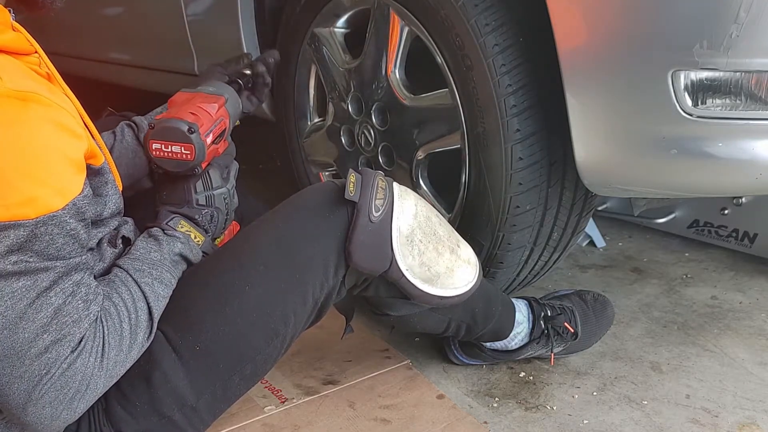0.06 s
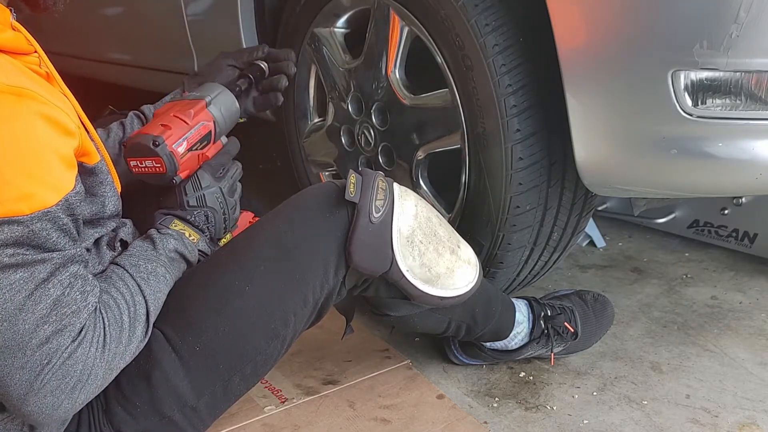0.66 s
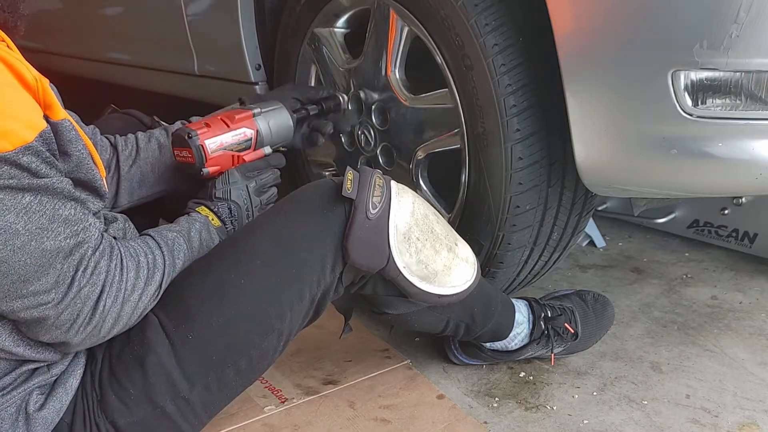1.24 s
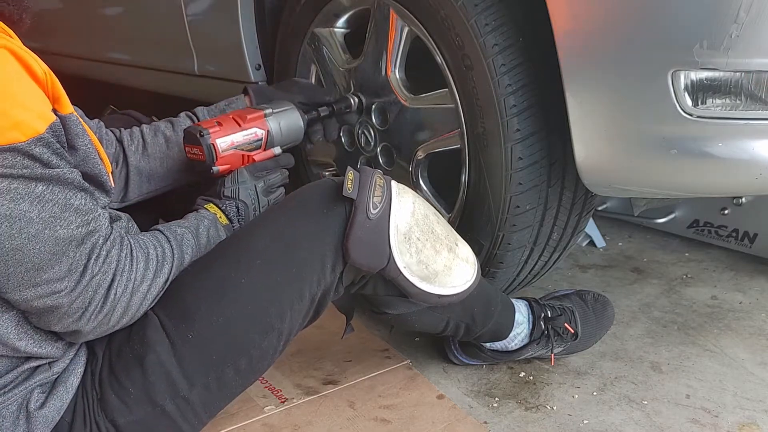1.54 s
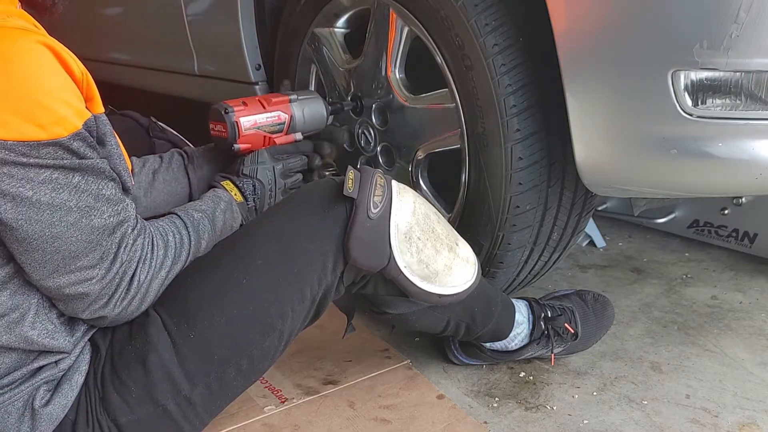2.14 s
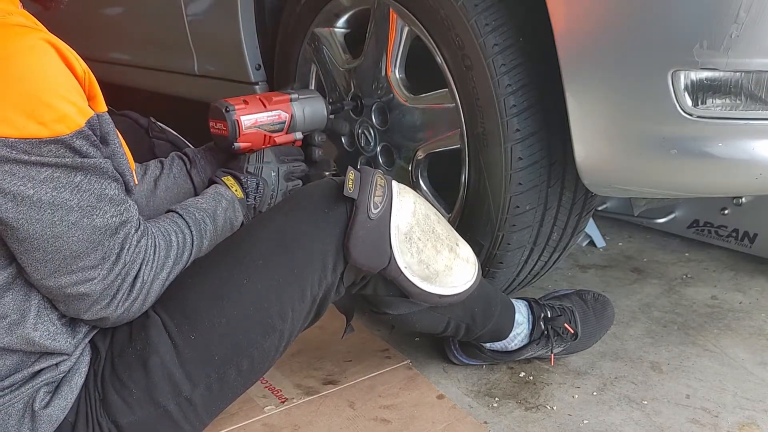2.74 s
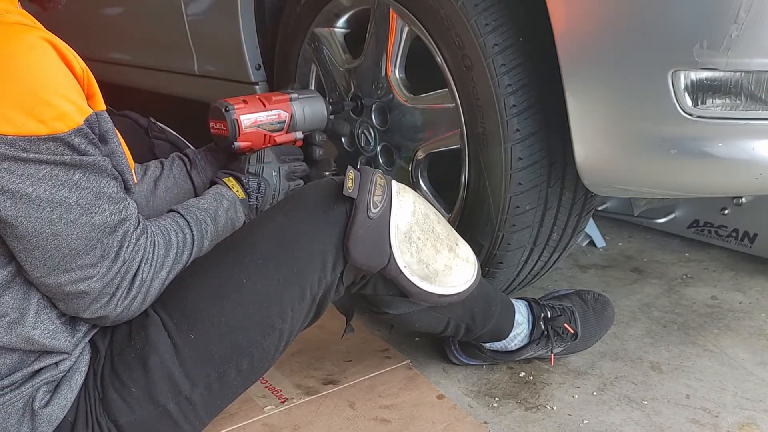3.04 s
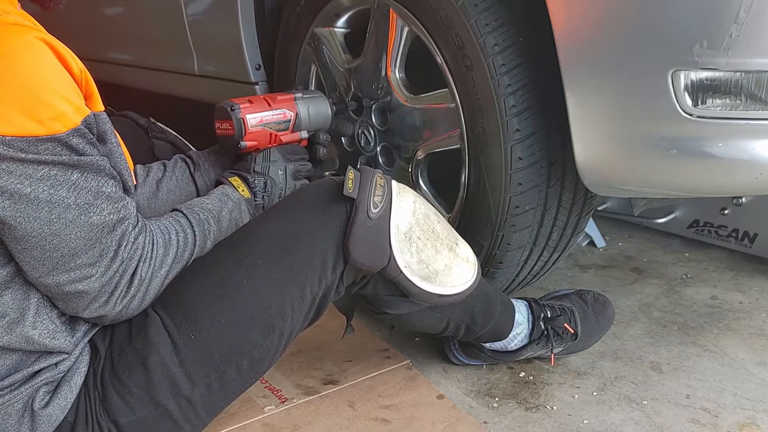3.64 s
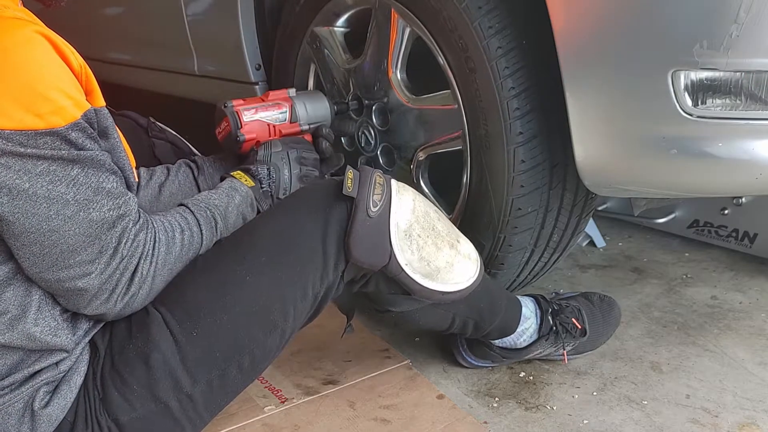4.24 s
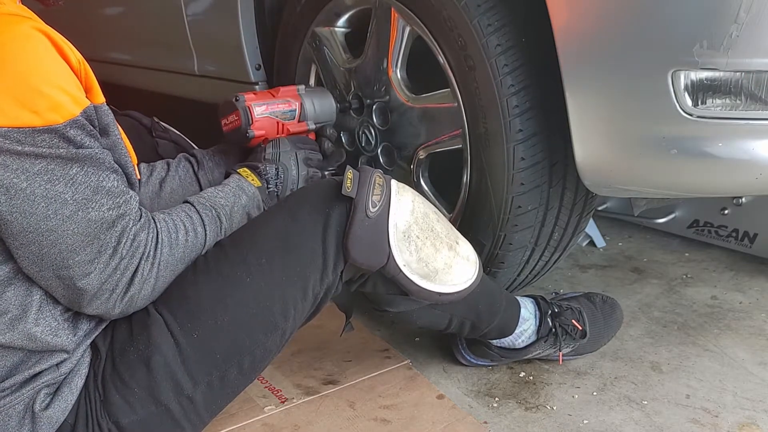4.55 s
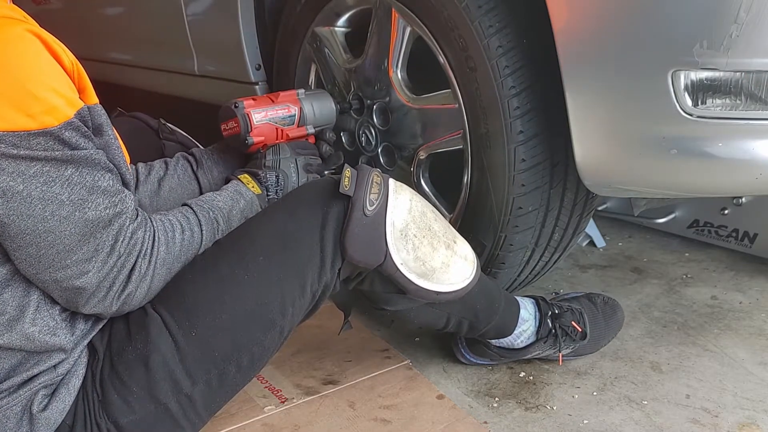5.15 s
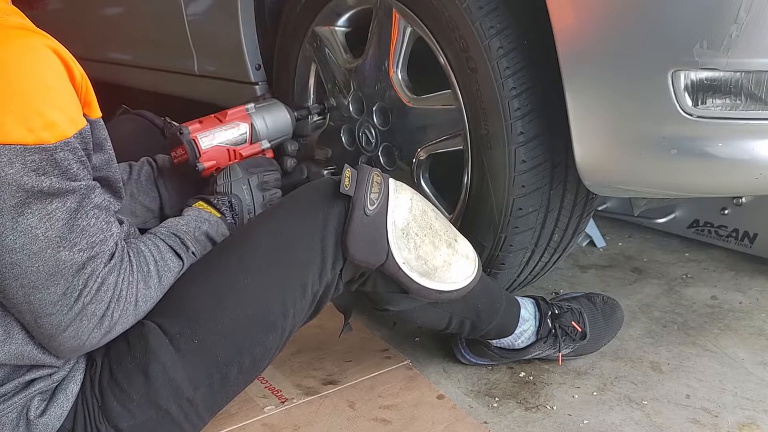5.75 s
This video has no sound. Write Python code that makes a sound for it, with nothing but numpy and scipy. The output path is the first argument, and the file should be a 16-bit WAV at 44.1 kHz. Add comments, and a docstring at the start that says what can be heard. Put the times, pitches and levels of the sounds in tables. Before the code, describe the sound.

A quiet garage with faint steady air noise, heard in stereo from about a metre away. Steel lug nuts clink lightly right at the start, followed by faint brushes of sleeves and gloves. Another small clink comes at 1.4 seconds, and a steel socket clacks onto the nut several times around 1.6. At 2.7 seconds a cordless impact wrench starts with one sharp strike and spins the nut down, its gears whirring under a thin high whistle, with ringing socket knocks near 3.0 and 3.5. From 3.9 the motor slows and the thread rumbles; a burst of loud hammer blows rings the wheel from 4.1 to 4.3, then the motor stops. A second short pull from 4.6 to 4.9 brings another rapid hammering burst. Each leaves a brief room echo. A light socket knock and nut click follow around 5.3 seconds, then only quiet air.

```python
"""Impact wrench at a car wheel

A garage, a pair of microphones about a metre from a cordless wrench. Lug nuts clink in a gloved hand,
the socket knocks onto a stud, and the motor spins the nut down with gear whirr and a thin inverter
whistle. The hammer strikes once at the start, then in two short bursts that ring the wheel."""
import sys
import numpy as np
from scipy import signal
from scipy.fft import rfft, irfft
from scipy.io import wavfile

SR = 44100
rng = np.random.default_rng(int(sys.argv[2]) if len(sys.argv) > 2 else 0)


def store_wav(level_fs):
    """Save 16-bit WAV to argv[1]."""
    pcm = np.round(np.clip(np.atleast_2d(level_fs), -1, 1) * 32767)
    wavfile.write(sys.argv[1], SR, pcm.T.astype(np.int16))


N = 255780
T = np.arange(N) / SR
FREE_HZ = 380  # electrical speed of the motor running free

# how alike the two microphones hear the room: (frequency [Hz], likeness [0-1])
LIKENESS = [(60, 0.97), (300, 0.87), (700, 0.7), (1500, 0.25), (4000, 0.095), (16000, 0.42)]


def amp(db):
    return 10 ** (np.asarray(db) / 20)


def unit_rms(x):
    return x / np.sqrt(np.mean(x ** 2) + 1e-30)


def read(points, hz):
    """Points joined by straight lines on a log-frequency axis."""
    f, value = np.transpose(points)
    return np.interp(np.log(hz + 1), np.log(f + 1), value)


def drift(rate_hz):
    """Slow random wander of rms 1."""
    hz = np.fft.rfftfreq(N, 1 / SR)
    return unit_rms(irfft(rfft(rng.standard_normal(N)) * np.exp(-(hz / rate_hz) ** 2), N))


def swells(rows):
    """A smooth rise and fall of amplitude for each row."""
    return sum(amp(db) * np.exp(-(2 * (T - s) / length) ** 2) for s, length, db in rows)


def noise(spectrum, size=N, tilt_db=0):
    """Coloured noise at two microphones, alike in the bass and less so in the treble."""
    hz = np.fft.rfftfreq(size, 1 / SR)
    left, other = rfft(rng.standard_normal((2, size)))
    alike = read(LIKENESS, hz)
    right = alike * left + np.sqrt(1 - alike ** 2) * other
    colour = amp(read(spectrum, hz) + tilt_db * np.log2(np.maximum(hz, 1100) / 2000))
    return unit_rms(irfft(np.array([left, right]) * colour, size))


def cracks(contacts, spectrum, scatter_db, scatter_s, rise_s):
    """Steel on steel: a short rattle, then scatter from the parts nearby."""
    out, t = np.zeros((2, N)), np.arange(2 ** 13) / SR
    for s, db, hardness, rattle_s in contacts:
        energy = np.exp(-2 * t / rattle_s) + amp(scatter_db) ** 2 * np.exp(-2 * t / scatter_s)
        envelope = amp(db) * np.sqrt(energy) * (1 - np.exp(-t / rise_s))
        crack = envelope * noise(spectrum, size=len(t), tilt_db=hardness)
        start = round(s * SR)
        out[:, start:start + len(t)] += crack[:, :N - start]
    return out


def dying(kicks, t60):
    """Energy put in by each kick, falling 60 dB in t60 seconds."""
    return signal.lfilter([1], [1, -np.exp(-np.log(10 ** 6) / (t60 * SR))], kicks)


def ringing(contacts, modes, ring_db, ping_db, ping_t60, blur):
    """Each contact feeds every mode with a ping and a ring. Loose seating blurs the pitch."""
    s, db, hardness, _ = np.transpose(contacts)
    out = np.zeros((2, N))
    for hz, mode_db, t60 in modes:
        kicks = np.zeros(N)  # harder contacts favour the high modes
        kicks[(s * SR).astype(int)] = amp(db + hardness * np.log2(hz / 3000) / 2) ** 2
        energy = amp(ring_db) ** 2 * dying(kicks, t60) + amp(ping_db) ** 2 * dying(kicks, ping_t60)
        swing = signal.lfilter([.03], [1, -.97], np.sqrt(energy + 1e-24))  # softens the onset
        phase_walk = np.cumsum(rng.standard_normal(N)) * np.sqrt(2 * np.pi * blur * hz / SR)
        phase = 2 * np.pi * hz * T + phase_walk
        apart = np.sqrt(1 - read(LIKENESS, hz)) * drift(24)
        out += amp(mode_db) * swing * np.cos([phase + apart, phase - apart])
    return out


def room_tone():
    """Still air that wavers and slowly eases off, with a distant low drone."""
    # spectra of the air and the drone: (frequency [Hz], relative level [dB])
    air = [(15, -51.5), (25, -22.5), (157, -3), (326, -7.5), (363, -12.5), (416, -10.5), (659, -16),
           (818, -16.5), (988, -23.5), (2110, -29), (6210, -40.5), (7310, -45.5), (8140, -44), (16000, -38)]
    drone = [(60, -43.5), (92, -19.5), (104, -1.5), (108, 1), (120, -13.5), (160, -44), (400, -83)]
    # the drone comes and goes: (time [s], relative level [dB])
    drone_levels = [(0.0, -64.5), (0.46, -64), (0.77, -80.5), (1.12, -61), (1.56, -62), (1.62, -73.5),
                    (2.57, -81), (2.6, -79.5)]
    drone_db = np.interp(T, *np.transpose(drone_levels)) + 1.5
    air_db = -66 - 0.64 * T - drift(8.1)
    return amp(air_db) * noise(air) + amp(drone_db) * noise(drone)


def lug_nuts():
    """Loose nuts touch in the hand and ring high and briefly."""
    # touches: (time [s], relative level [dB], hardness [dB/octave], rattle time [s])
    clinks = [(.002, -54, -2.5, 0.13), (.0545, -32, -7, 0.0006), (.112, -49, -1.5, 0.024),
              (.1438, -45, -5, 0.0088), (1.420, -47.5, 2, 0.0043), (5.276, -64, 6, .004),
              (5.341, -50, -6, .006)]
    # spectrum of a touch: (frequency [Hz], relative level [dB])
    spectrum = [(300, -37), (1200, -31), (1700, 0), (2200, -4.5), (3200, -5.5), (4000, -4.5), (5200, -6),
                (8000, -2.5), (10500, -28), (12200, 2), (13500, -17.5), (16000, -24.5)]
    # modes of a nut: (frequency [Hz], relative level [dB], t60 [s])
    modes = [(2100, -7, 0.055), (7060, -1, 0.027), (9200, -16, .05), (11900, 1.5, 0.18),
             (12000, -5.5, 0.21), (12400, -21.5, .09)]
    return (cracks(clinks, spectrum, scatter_db=-9.5, scatter_s=0.01, rise_s=0.0011)
            + ringing(clinks, modes, ring_db=-5.5, ping_db=-8, ping_t60=0.033, blur=0.021))


def faint_tones():
    """Two soft tones swell and fade, a low one early and a high one late."""
    # tones: (middle [s], length [s], pitch [Hz], level [dB])
    tones = [(0.53, 0.23, 497, -63.5), (5.698, 0.05, 7300, -78)]
    out = np.zeros(N)
    for s, length, hz, db in tones:
        pitch = hz * (1 + 0.0043 * drift(200))
        out += swells([(s, length, db)]) * np.sin(2 * np.pi * np.cumsum(pitch) / SR)
    return out


def cloth():
    """Sleeves and gloves brush in soft swells of friction."""
    # brushes: (middle [s], length [s], level [dB])
    brushes = [(0.618, 0.14, -73), (.77, 0.35, -79.5), (1.366, 0.13, -76.5), (1.595, 0.058, -60.5),
               (2.106, 0.057, -70)]
    # spectrum of the fabric: (frequency [Hz], relative level [dB])
    spectrum = [(200, 2), (1200, -1.5), (3500, -4), (9000, -15.5), (16000, -12.5)]
    return swells(brushes) * noise(spectrum) * amp(1.4 * drift(120))


def socket():
    """The steel socket knocks on nut and stud, and rings."""
    # knocks: (time [s], relative level [dB], hardness [dB/octave], rattle time [s])
    knocks = [(1.44, -62, -14.5, 0.033), (1.609, -24, 5.5, .0024), (1.648, -37.5, 10, .009),
              (1.677, -32.5, 4, 0.013), (1.685, -32, -1.5, 0.0072), (2.660, -47, 4.5, 0.0082),
              (3.016, -32, 2, 0.007), (3.464, -22, 3.5, 0.0072), (3.483, -35.5, -11, 0.077),
              (4.073, -36.5, -6, 0.031), (4.156, -23, -13.5, .007), (4.541, -51, 0.5, 0.071),
              (4.597, -45.5, 2.5, 0.023), (5.274, -43.5, 1.5, 0.0075)]
    # spectrum of a knock: (frequency [Hz], relative level [dB])
    spectrum = [(40, -68.5), (150, -22.5), (400, -16.5), (750, -17), (1300, 5), (2050, 6.5), (2800, -0.5),
                (3550, 8), (4000, 7.5), (5450, -6), (6200, -3.5), (7300, -7), (8500, -19.5), (10400, -19.5),
                (16000, -28.5)]
    # modes of the socket on its stud: (frequency [Hz], relative level [dB], t60 [s])
    modes = [(1005, -11.5, 0.41), (1190, -11, .2), (1408, -3.5, 0.42), (2020, 0, 0.42), (3504, 4, 0.25),
             (3715, -2.5, 0.18), (4406, -4, 0.12), (5410, 0, .16), (5490, -8.5, 0.35), (5740, -9.5, 0.36),
             (6920, -18, 0.6), (7500, -19, .25)]
    return (cracks(knocks, spectrum, scatter_db=-11, scatter_s=0.049, rise_s=0.003)
            + ringing(knocks, modes, ring_db=-14.5, ping_db=-10, ping_t60=0.068, blur=0.0041))


def thread(speed):
    """The thread rumbles with the speed, and in swells where nut and socket rub on the stud."""
    # rubs: (middle [s], length [s], relative level [dB])
    rubs = [(1.705, 0.083, -45), (3.02, .05, -40), (3.18, .05, -42.5), (3.66, .22, -45.5), (3.93, .06, -45),
            (4.095, 0.068, -36.5), (4.15, .045, -26), (4.3, 0.14, -33), (4.88, .08, -28.5)]
    # spectrum of the rumble: (frequency [Hz], relative level [dB])
    spectrum = [(40, -69), (80, -26), (130, -4.5), (300, 6), (560, 0.5), (900, -2.5), (1600, 0),
                (3000, -24), (6000, -65)]
    level = amp(-75.45) * speed / FREE_HZ + amp(-9.45) * swells(rubs)
    return level * noise(spectrum) * amp(0.97 * drift(45))


def motor_speed():
    """Two pulls of the trigger; the speed sags as the nut tightens."""
    # first and second pull: (time [s], electrical speed [Hz])
    run_down = [(2.648, 0), (2.75, 335.5), (2.83, 400), (2.97, 421.5), (3.02, 410), (3.08, 430.5),
                (3.16, 425.5), (3.21, 380), (3.35, 360.5), (3.56, 381), (3.72, 376.5), (3.88, 319),
                (3.93, 217.5), (4.07, 238), (4.22, 153), (4.31, -4)]
    tighten = [(4.595, 4.5), (4.71, 221.5), (4.84, 167.5), (4.92, 0)]
    return np.maximum(np.interp(T, *np.transpose(run_down + tighten)), 0)


def gears(speed):
    """Meshing teeth whirr and sing, louder as the motor speeds up."""
    # spectrum of the whirr: (frequency [Hz], relative level [dB])
    spectrum = [(290, -34.5), (550, -12), (730, -20), (1180, -12), (1820, -6.5), (2600, 2), (3400, -6.5),
                (4800, -10), (7000, -11.5), (8300, -16), (10900, -11.5), (13000, -20.5), (14500, -18),
                (16000, -18.5)]
    # gear and bearing tones: (pitch [multiple of speed], relative level [dB], waver [share of pitch])
    tones = [(.8, -18, .012), (1.52, -12.5, 0.024), (2.28, -16, 0.015), (3.24, -2.5, .009),
             (4, -8.5, 0.0046), (4.55, -6, .012), (5.6, -7.5, 0.0053), (6, -11.5, 0.002), (6.93, 1.5, .007),
             (7.95, -17.5, .008), (9.9, -7, 0.024), (14.9, -14, .0023)]
    # the tones stand out as the motor frees: (speed [Hz], gain [ratio])
    tone_gains = [(220, 0.12), (360, 0.73), (410, 0.77)]
    rotor_turns = np.cumsum(speed) / SR / 2  # two electrical cycles to a turn
    teeth = 1 + .35 * np.cos(2 * np.pi * rotor_turns) + 0.095 * drift(250)
    whirr = amp(6.5) * noise(spectrum) * unit_rms(teeth)
    singing = np.interp(speed, *np.transpose(tone_gains))
    for multiple, db, waver in tones:
        phase = 2 * np.pi * np.cumsum(multiple * speed * (1 + waver * drift(40))) / SR
        mic_phases = 0.87 * np.array([drift(4.1), drift(5.5)])
        flutter_db = 2.5 * drift(25)
        whirr += singing * amp(db + flutter_db) * np.sqrt(2) * np.cos(phase + mic_phases)
    return amp(-50.95) * (speed / FREE_HZ) ** 0.64 * whirr


def housing(speed, resonant_hz=232, half_width_hz=48):
    """The housing rings, most at the motor speed where the gear mesh meets its resonance."""
    # spectrum of the ring: (frequency [Hz], relative level [dB])
    spectrum = [(1200, -68), (2300, -23.5), (2560, 0), (2660, -16), (2780, 2), (2890, 2.5), (3080, -14),
                (3500, -12.5), (6000, -61.5)]
    resonance_db = 15 * np.exp(-((speed - resonant_hz) / half_width_hz) ** 2)
    return noise(spectrum) * amp(-55.95 + resonance_db + 2.8 * drift(80))


def inverter(speed, switch_hz=7880):
    """The switched motor current whistles in pairs of lines that part as the speed rises."""
    # whistle lines: (carrier [multiple of switching rate], offset [multiple of speed])
    sidebands = [(1, 1), (1, -1), (1, 0), (1, 2), (1, -2), (1, -3), (1, -4), (1, 4), (2, -1), (2, -2),
                 (2, -3)]
    # strength of each line: (relative level [dB])
    levels = [-49.5, -54, -68.5, -60, -61, -56.5, -67.5, -57.5, -57.5, -65.5, -66.5]
    # the motor case favours some pitches: (frequency [Hz], gain [dB])
    motor_case = [(7000, 0), (7440, 2), (7570, 1), (7660, 7.5), (7880, -5.5), (8110, -3), (8200, 1),
                  (8255, 3), (8310, -0.5), (8700, -3)]
    cycles, whistle = np.cumsum(speed) / SR, np.zeros((2, N))
    for (carrier, side), db in zip(sidebands, levels):
        phase = 2 * np.pi * (carrier * switch_hz * T + side * cycles)
        case_db = read(motor_case, carrier * switch_hz + side * speed)
        wander = np.array([drift(21), drift(21)])  # the moving hand shifts the path to each microphone
        whistle += amp(db + case_db + 2.1 * wander) * np.sqrt(2) * np.cos(phase + .3 * wander[::-1])
    drive = 0.3 + 0.39 * (speed / FREE_HZ) ** 2
    return drive * whistle


def hammer(rattle_s=0.0029, rebound_s=0.0081, loss_db=5.5):
    """The hammer hits the anvil and rebounds three times; the first rebound can be softer or louder than the
    blow, and each later one is weaker; the wheel rings."""
    # blows: (time [s], relative level [dB], hardness [dB/octave], first rebound against the blow [dB])
    blows = [(2.7425, -21.5, 5, -27), (4.1295, -25, -5, -14), (4.1555, -22, 4.5, -11.5),
             (4.216, -15.5, 2.5, 3.5), (4.2535, -12, 3.5, -6), (4.284, -25.5, -7.5, -4),
             (4.671, -23, 3, -31.5), (4.727, -19.5, 2.5, -4), (4.7655, -15, 3, -2.5),
             (4.7966, -16.5, 3, -11.5), (4.851, -19, 0.5, 3), (4.865, -15, 5, -6.5), (4.889, -21, 2, -3.5)]
    # spectrum of a blow: (frequency [Hz], relative level [dB])
    spectrum = [(35, -81), (90, -33.5), (160, -27), (240, -4.5), (570, -1.5), (700, 0), (1310, 1.5),
                (2040, 0), (3050, -3), (6840, -10), (8110, -16.5), (11000, -14.5), (14000, -21),
                (16000, -24.5)]
    # modes of wheel and brake disc: (frequency [Hz], relative level [dB], t60 [s])
    modes = [(290, -13.5, 1), (381, -4.5, 0.3), (538, -4, 0.33), (572.3, -1.5, .28), (602, -7, 0.72),
             (924, -15.5, 0.42), (1005, -13.5, 0.93), (1210, -9, 0.22), (1440, -15.5, 0.73),
             (1760, -8, 0.54), (1970, -10.5, 0.36), (2086, -0.5, 0.18), (2260, -14, 0.46),
             (2640, -15.5, .3), (2830, -18.5, 0.47), (3020, -17.5, 0.48), (3705, -2.5, 0.14),
             (5920, -17, 0.55), (6900, -6.5, .25)]
    strikes = []
    for s, db, hardness, rebound_db in blows:
        strikes.append((s, db, hardness, rattle_s))
        for k in range(3):
            strikes.append((s + (k + 1) * rebound_s, db + rebound_db - k * loss_db, hardness, rattle_s))
    return (cracks(strikes, spectrum, scatter_db=-11.5, scatter_s=0.033, rise_s=0.00069)
            + ringing(strikes, modes, ring_db=-24.5, ping_db=-21.5, ping_t60=0.32, blur=.004))


def garage(sound, build_s=0.0087):
    """A diffuse tail from walls, floor and car body, each band dying at its own speed."""
    # decay of the room: (frequency [Hz], t60 [s])
    decay = [(100, 0.5), (300, 0.4), (1000, 0.5), (3000, 0.56), (6500, 0.61), (9000, 0.37), (16000, 0.23)]
    white = noise([(20, 0), (20000, 0)], size=SR)
    hz, t, bands = signal.stft(white, SR, nperseg=256)
    _, tail = signal.istft(bands * amp(-60 * t / read(decay, hz)[:, None]), SR, nperseg=256)
    tail *= 1 - np.exp(-(np.arange(tail.shape[1]) / SR / build_s) ** 2)
    return signal.fftconvolve(sound, tail / np.linalg.norm(tail[0]), axes=1)[:, :N]


def scene():
    """Motor, hammer, socket and nuts sound into the garage, over cloth and room tone."""
    speed = motor_speed()
    engaged = np.minimum(speed / 30, 1)  # the gears are fully engaged from 30 Hz
    motor = gears(speed) + engaged * housing(speed) + thread(speed)
    blows, knocks, clinks = hammer(), socket(), lug_nuts()
    reverb = garage(amp(-2) * motor + amp(-13) * blows + amp(-21) * knocks + amp(-16) * clinks)
    whistle = engaged * inverter(speed)
    return motor + whistle + blows + knocks + clinks + cloth() + faint_tones() + reverb + room_tone()


def record(dry, lag_samples=5, cutoff_hz=15950):
    """Two microphones of slightly different colour, the right a little farther away; then a low-pass."""
    # balance of the pair: (frequency [Hz], left minus right [dB])
    balance = [(60, 0.5), (180, 2.5), (600, 1.8), (2000, 1.5), (4500, -2.5), (9000, 1), (14000, 3.5)]
    half_db = read(balance, np.fft.rfftfreq(N, 1 / SR)) / 2
    left, right = irfft(rfft(dry) * amp([half_db, -half_db]), N)
    pair = np.array([left, np.pad(right, (lag_samples, 0))[:N]])
    low_pass = signal.firwin(511, cutoff_hz, window=("kaiser", 9), fs=SR)
    return signal.oaconvolve(pair, low_pass[None], "same")


dry = scene()
out = record(dry)
store_wav(out)
```